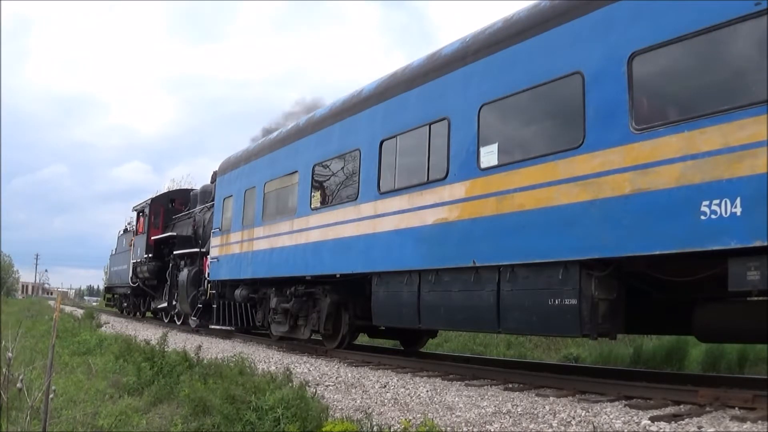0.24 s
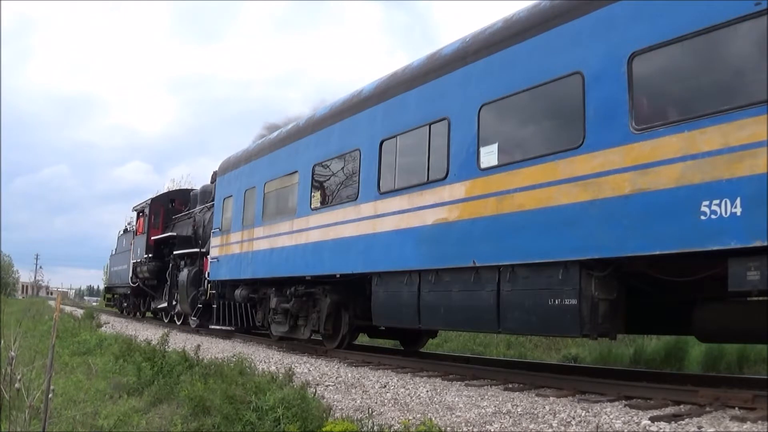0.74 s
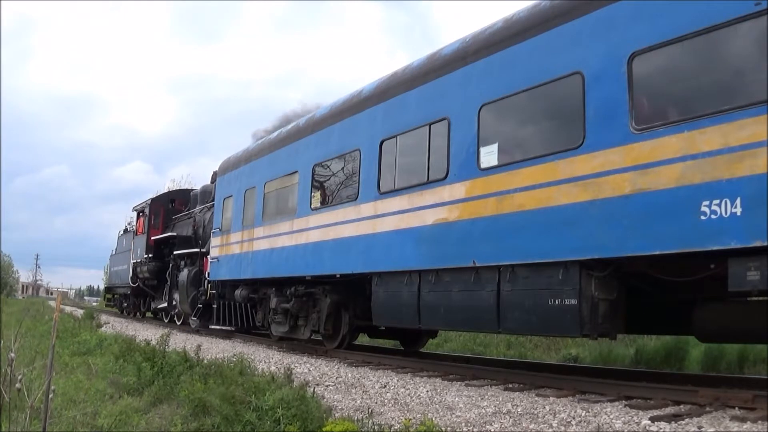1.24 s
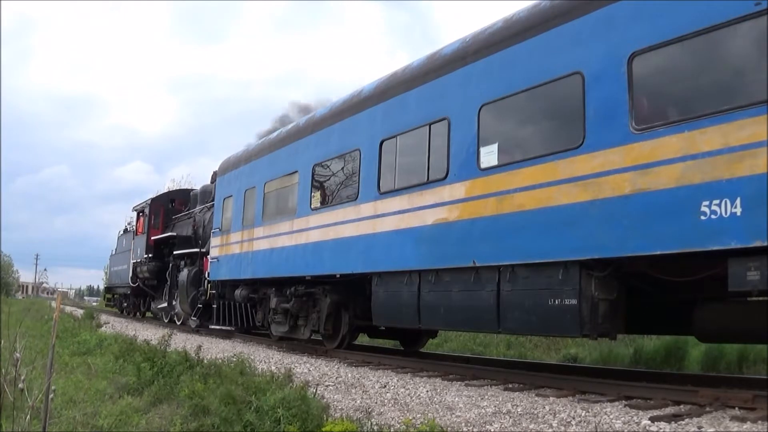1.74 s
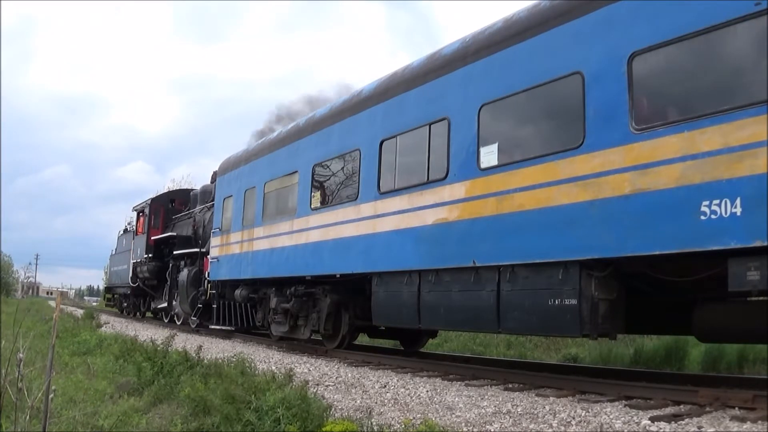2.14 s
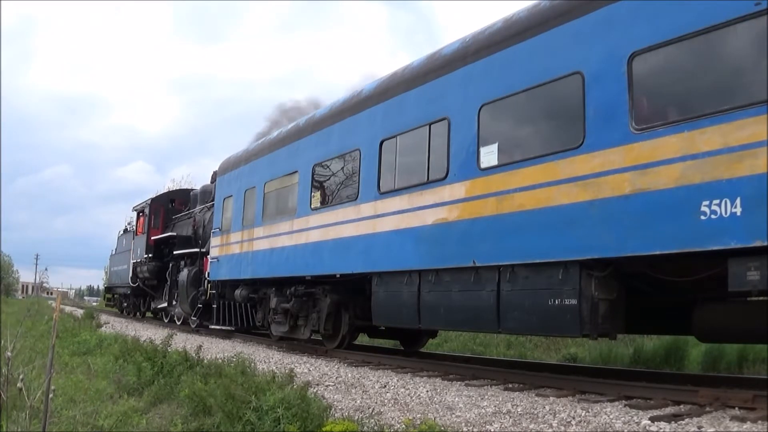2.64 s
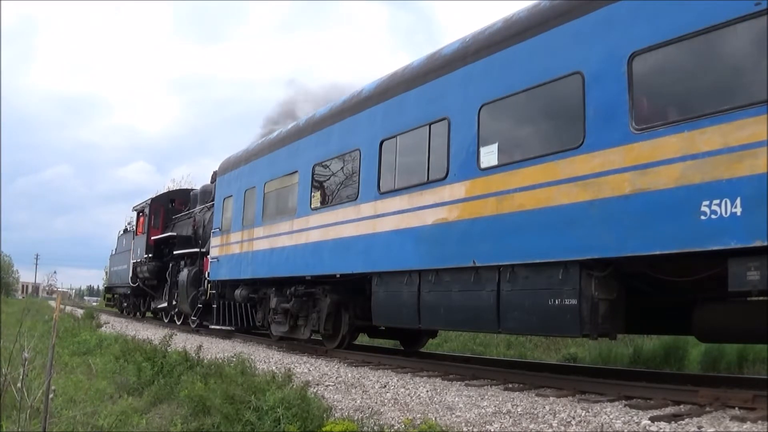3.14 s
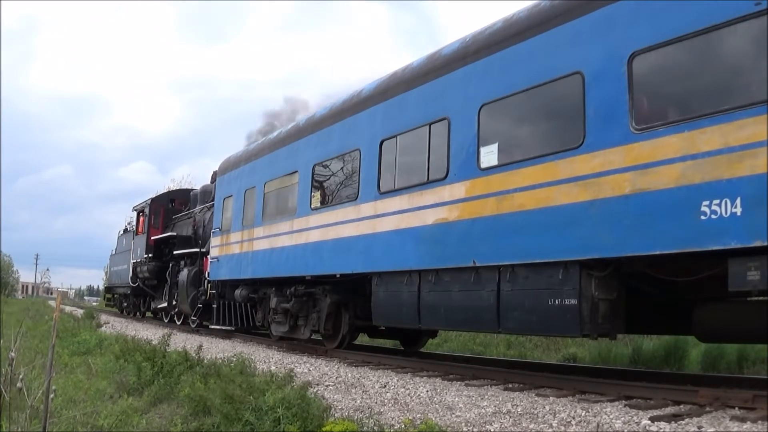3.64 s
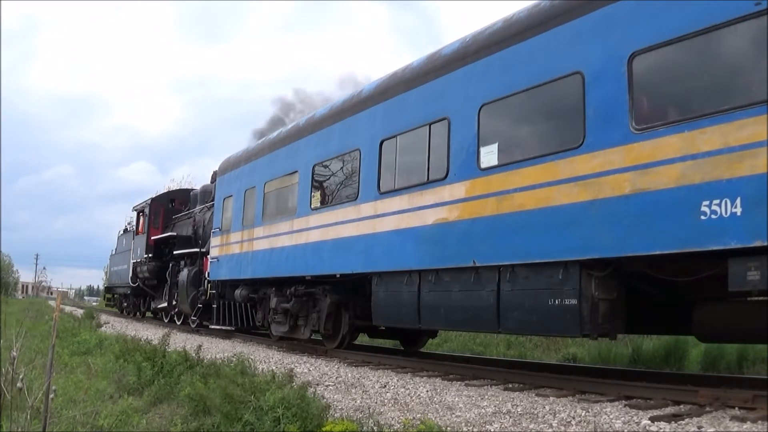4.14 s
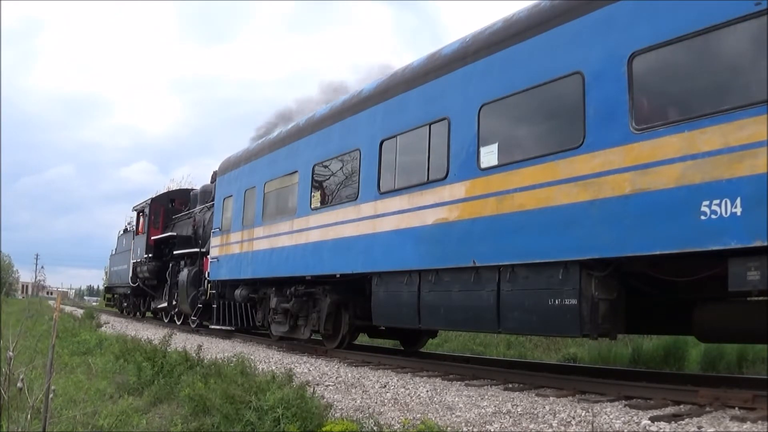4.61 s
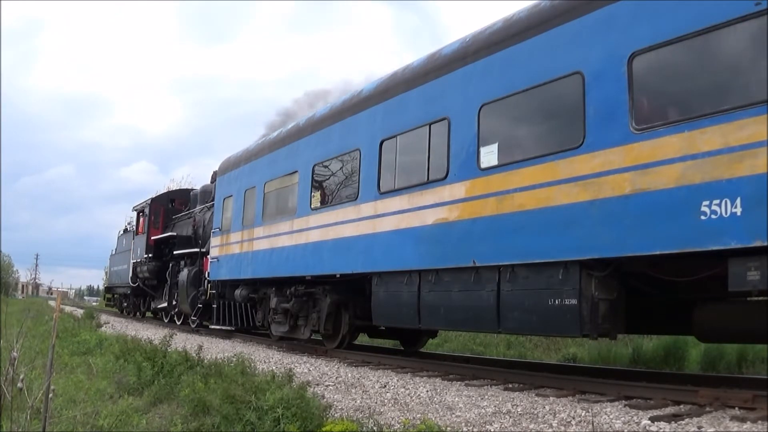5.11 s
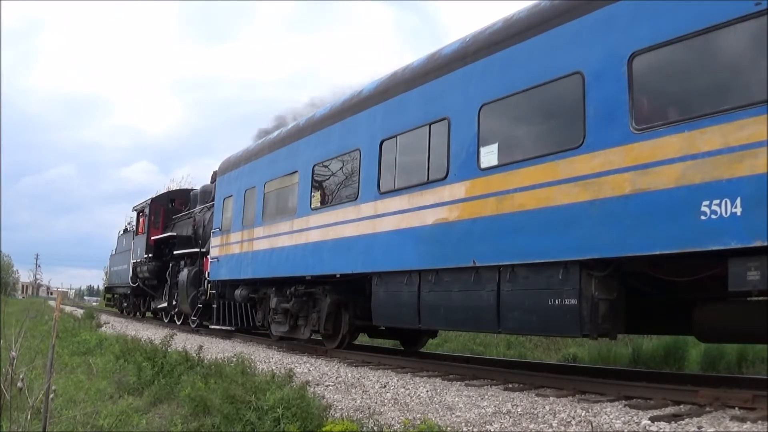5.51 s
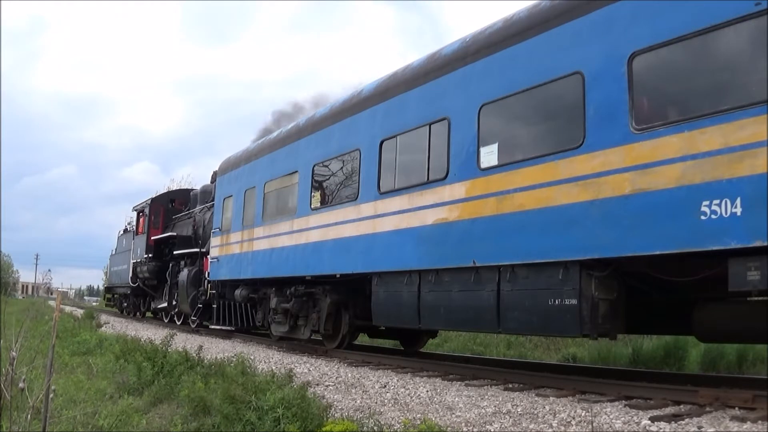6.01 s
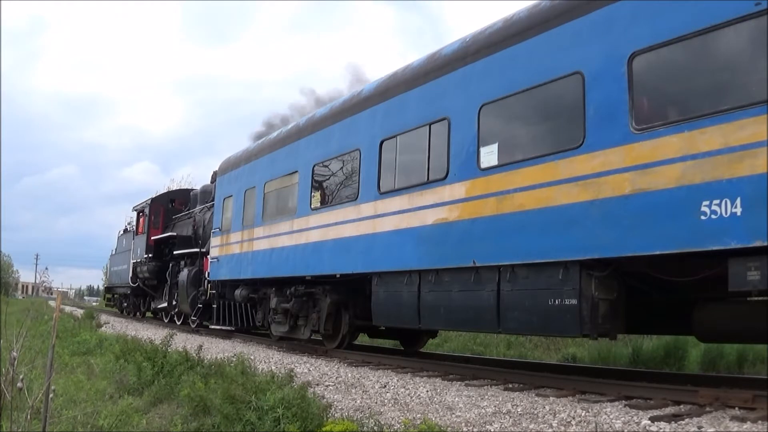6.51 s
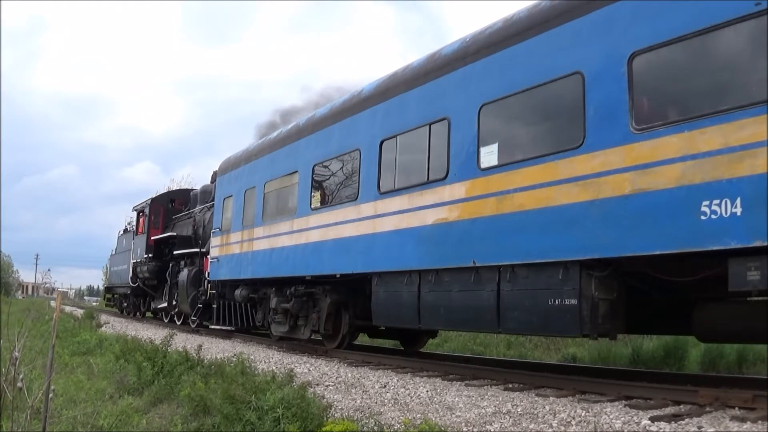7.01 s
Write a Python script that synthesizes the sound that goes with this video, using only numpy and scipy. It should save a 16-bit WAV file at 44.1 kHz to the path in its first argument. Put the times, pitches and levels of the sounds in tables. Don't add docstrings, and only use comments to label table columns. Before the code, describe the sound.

Close, bright steam hiss with low wind buffeting opens the scene, ducking under gusts. A tiny squeak leads into a rough blow-off with wavering howls, which thins, whistles piercingly and cuts off in two quick steps. Near-quiet follows; the automatic gain of the stereo microphone slowly lifts the remaining hiss and its fine pinhole whistles, with a few isolated wind thumps in open air.

```python
import sys
import numpy as np
from scipy import signal
from scipy.fft import rfft, irfft
from scipy.io import wavfile
from scipy.ndimage import uniform_filter1d

SR = 44100
rng = np.random.default_rng(int(sys.argv[2]) if len(sys.argv) > 2 else 0)


def amplitude_ratio(level_db):
    exponent = np.asarray(level_db, float) / 20
    return 10 ** exponent


def dump(signal):
    limited = np.clip(np.atleast_2d(signal).T, -1, 1)
    pcm = np.round(limited * 32767).astype(np.int16)
    wavfile.write(sys.argv[1], SR, pcm)


N = 320166

LEAK_BANDS_HZ = (4500, 1000, 12500)
LEAK_DB = -16
VALVE_OPENS_S = 1.078
# (time [s], thump peak [dB], pitch [Hz], rumble [dB])
EDDIES = [(0.04, -26, 124, -23), (0.121, -4.5, 136, -21.5), (0.246, -14, 72.7, -26), (0.415, -10, 74, -17),
          (0.549, -6, 143, -24), (0.642, -14, 130, -15), (0.698, -16, 144, -16.5), (0.764, -17, 108, -15),
          (0.842, -7.5, 159, -18), (0.942, -8, 153, -11), (1.311, -21, 148, -26.5),
          (1.492, -10.5, 250, -25), (1.614, -21.5, 303, -30), (1.692, -17, 188, -26.5),
          (1.836, -32, 133, -27), (2.048, -30, 130, -36.5), (2.245, -21.5, 140, -35),
          (2.326, -30, 150, -43), (2.55, -33, 250, -40.5), (2.678, -33, 137, -38.5),
          (2.784, -39, 72.7, -43), (3.05, -42, 110, -41), (3.67, -45, 100, -47), (4.288, -23, 110, -33.5),
          (4.36, -25, 135, -35), (5.32, -30, 150, -34), (6.09, -15.5, 130, -22.5), (6.165, -20, 110, -26),
          (4.442, -28, 132, -44), (7.12, -34, 87, -48)]


def clock():
    return np.arange(N) / SR


def louder(*levels_db):
    return 10 * np.log10(sum(amplitude_ratio(db) ** 2 for db in levels_db))


def bump(center_s, half_s):
    return np.exp(-((clock() - center_s) / half_s) ** 2)


def along(table, hz):
    at, value = np.transpose(table)
    return np.interp(np.log(hz + 1), np.log(at + 1), value)


def patches(rows, seconds, steps, count):
    field = rng.standard_normal((rows, len(seconds)))
    for _ in range(2):
        field = uniform_filter1d(field, max(int(steps), 1), axis=1)
        field = uniform_filter1d(field, count, axis=0)
    return field / field.std()


def ports(gain, likeness, lead, balance_db):
    size = 2 * (len(gain) - 1)
    mid, side = rfft(rng.standard_normal((2, size)))
    likeness = np.clip(likeness, 0, 1)
    mid = mid * np.sqrt(1 + likeness)
    side = side * np.sqrt(1 - likeness)
    turn = amplitude_ratio(balance_db / 2) * np.exp(.5j * lead)
    left, right = (mid + side) * turn, (mid - side) / turn
    return irfft(gain * np.array([left, right]), size)[:, :N]


def steam(level_db, shifts_db, bands_hz, colour, modes, band, swirl_db, flutter_db, puff_db):
    # (frequency [Hz], likeness [0-1], left minus right [dB], left leads by [rad])
    port_table = np.array([(172, 0.96, 0.4, 0.1), (517, 0.96, 1.0, 0.08), (1034, 0.9, 2.1, -0.02),
                           (2067, 0.85, 1.8, -0.04), (2929, 0.87, 1.7, -0.23), (3790, 0.94, 0.8, 0.0),
                           (4823, 0.88, 2.2, 0.13), (6029, 0.93, 2.9, 0.11), (7235, 0.86, 2.9, -0.12),
                           (8613, 0.93, 1.1, -0.2), (9647, 0.96, 0.2, -0.01), (11197, 0.96, 0.3, 0.03),
                           (12200, 0.97, 0.1, 0.0), (13781, 1.0, -0.0, -0.0)])
    hz = np.fft.rfftfreq(2 ** 19, 1 / SR)
    ring = 1 + sum(amplitude_ratio(db) ** 2 / (1 + (2 * (hz - f) / width) ** 2) for f, (width, db) in zip(*modes))
    gain = amplitude_ratio(along(colour, hz)) * np.sqrt(ring)
    likeness, balance_db, lead = (along(port_table[:, [0, k]], hz) for k in range(1, 4))
    jet = ports(gain, likeness, lead, balance_db)

    inside = (hz > band[0]) & (hz < band[1])
    band_share = np.sum(gain[inside] ** 2) / np.sum(gain ** 2)
    jet = jet / np.sqrt(np.mean(jet.mean(axis=0) ** 2) * band_share)
    f, t, cells = signal.stft(jet, SR, nperseg=256)
    db = np.interp(t, clock(), level_db)

    order = np.argsort(bands_hz)
    shift = np.array([0 * t] + [np.interp(t, clock(), e) for e in shifts_db])[order]
    place = np.interp(np.log(f + 1), np.log(np.array(bands_hz)[order]), np.arange(len(order)))
    tilt = np.maximum(1 - abs(place[:, None] - np.arange(len(order))), 0) @ shift

    swirl = swirl_db * patches(len(f), t, steps=65, count=2) * np.clip(f / 900, .3, 1)[:, None]
    flutter = flutter_db * patches(len(f), t, steps=5.4, count=12)
    puffs = puff_db * patches(1, t, steps=11.4, count=1)
    cells = cells * amplitude_ratio(db + tilt + swirl + flutter + puffs)
    return signal.istft(cells, SR, nperseg=256)[1][:, :N]


def swelling(follow_db, under_db, swells):
    t = clock()

    def bell(s, db, half):
        return np.maximum(db - 8.7 * ((t - s) / half) ** 2, -120)

    return np.array([louder(follow_db + db, *[bell(*row) for row in rows])
                     for db, rows in zip(under_db, swells)])


def whistles(levels_db, centre_hz, wander_hz, trim_db):
    t = clock()
    shiver = patches(3, t, steps=300, count=1)
    waver = patches(3, t, steps=900, count=1)
    hz = np.array(centre_hz)[:, None] + np.array(wander_hz)[:, None] * shiver
    strength = np.sqrt(2) * amplitude_ratio(levels_db + 1.46 * waver + trim_db)
    tones = np.sum(strength * np.sin(2 * np.pi * np.cumsum(hz, axis=1) / SR), axis=0)
    return tones * amplitude_ratio(np.array([[.8], [-.8]]))


def leak_before():
    # (frequency [Hz], level [dB per Hz])
    hiss_colour = [(410, -5.5), (700, -12), (1120, -11.5), (2000, -7.5), (3540, -7), (5000, -5.5),
                   (9900, -1.5), (11300, -10.5), (14000, -21.5), (15700, -35)]
    pipe_hz = (1238, 1670, 2040, 2387, 2830, 2985, 3160, 3890, 4320, 4750, 5150, 5600, 6450, 6870, 7740,
               8900, 9660, 10200)
    # (width [Hz], level over the hiss [dB])
    pipe_ring = [(29.8, 8.5), (50, 2.5), (60, 8), (35, 9.5), (35, 12), (50, 2), (80, 3.5), (45, 12.5),
                 (50, 10.5), (39.8, 12), (70, 6), (100, 6), (70, 2), (60, 6), (110, 4), (300, 0.5),
                 (129.6, -7), (108, 3)]
    duck_s, duck_db, recover_s = (.12, .548, .958), (-0.5, -8.5, -5.5), 0.29
    t = clock()
    level_db = LEAK_DB - 15 * bump(.964, 0.012)
    for s, db in zip(duck_s, duck_db):
        level_db = level_db + db * np.clip((t - s) / .012, 0, 1) * np.exp(-np.maximum(t - s, 0) / recover_s)
    bass_db = 0.5 + 0.22 * (LEAK_DB - level_db)
    return steam(level_db, [bass_db, 0 * t], LEAK_BANDS_HZ, hiss_colour, (pipe_hz, pipe_ring),
                 (2000, 10000), swirl_db=0.5, flutter_db=0.56, puff_db=0.48)


def gusts():
    # (time [s], level [dB])
    breeze = [(0.0, -17), (0.3, -14.5), (0.46, -38), (0.54, -34), (0.57, -13.5), (0.92, -28), (1.075, -15),
              (1.11, -37), (1.8, -46), (2.1, -62), (3.2, -72), (4.25, -64), (4.5, -60), (5.6, -69),
              (6.05, -60), (6.26, -42), (6.65, -62), (7.26, -46)]
    lag_s, rise_db_per_s, fall_db_per_s = 0.013, 380, 198
    t = clock()[::64]
    since = t - np.array(EDDIES)[:, :1] - lag_s
    peaks = np.array(EDDIES)[:, 3:] - np.where(since < 0, -rise_db_per_s, fall_db_per_s) * since
    level_db = louder(np.interp(t, *np.transpose(breeze)), *np.maximum(peaks, -120))
    return np.interp(clock(), t, level_db)


def wind():
    # (frequency [Hz], level [dB per Hz])
    rumble_colour = [(12, -39), (20, -16), (59, -1), (92, -3.5), (135, -2), (240, -5), (687, -20),
                     (900, -21.5), (1170, -33), (1980, -120)]
    hz = np.fft.rfftfreq(2 ** 19, 1 / SR)
    likeness, lag_s = 0.73 * np.exp(-hz / 1200), .0006
    rumble = ports(amplitude_ratio(along(rumble_colour, hz)), likeness, 2 * np.pi * hz * lag_s, 0 * hz)
    lumps = np.repeat(patches(1, clock()[::64], steps=9, count=1)[0], 64)[:N]
    rumble = rumble * amplitude_ratio(1.5 * uniform_filter1d(lumps, size=64))
    return rumble / rumble.mean(axis=0).std() * amplitude_ratio(gusts() - 3.0)


def thumps():
    slap_db, slap_ratio = -10.5, 2.05
    out = np.zeros((2, N + SR))
    chance = rng.uniform(-1.02, 1, (len(EDDIES), 3))
    u = np.arange(SR // 10) / SR
    for (s, db, hz, _), (turn, twist, side) in zip(EDDIES, chance):
        i = int(s * SR)
        swing = (u - .015) * hz
        pan_db = 4 * side
        phase = 2 * np.pi * swing + np.pi * turn + np.array([[.6], [-.6]]) * (1 + 0.2 * twist)
        thump = np.exp(-(swing / 0.63) ** 2) * np.cos(phase)
        slap = amplitude_ratio(slap_db) * np.exp(-(slap_ratio * swing / 0.75) ** 2) * np.cos(slap_ratio * phase)
        out[:, i:i + len(u)] += amplitude_ratio(db + np.array([[pan_db], [-pan_db]]) / 2) * (thump + slap)
    return out[:, :N]


def squeak():
    start_s, peak_db, hz, half_s = 1.082, -16, 3300, .004
    return amplitude_ratio(peak_db) * bump(start_s, half_s) * np.sin(2 * np.pi * hz * (clock() - start_s))


def blast_flow():
    # (time [s], level [dB], surge [dB])
    blast_table = [
        (1.11, -18.5, -12),
        (1.24, -18, 3),
        (1.6, -19, 4),
        (1.85, -19.5, 1),
        (2.15, -18, -0.5),
        (2.38, -17, 4.5),
        (2.62, -17.5, -5),
        (2.85, -18, 9),
        (3.08, -16.5, -4),
    ]
    surge_share = (0.87, 0.2, -.1)
    thin_from_s, cut_s = 3.123, 3.385
    thin_db_per_s, late_s = (-7, -33, -75), (0, 0, .1)
    cut_db_per_s, linger = -300, (0.57, .3, 0.1)
    sag_db_per_s = -32
    t = clock()
    s, level_db, surge_db = np.transpose(blast_table)
    thin = np.clip(t - thin_from_s, 0, cut_s - thin_from_s)
    cut_db = cut_db_per_s * np.maximum(t - cut_s, 0)
    surge = np.interp(t, s, surge_db)
    shifts = [share * surge + rate * np.maximum(thin - late, 0) - stay * np.maximum(cut_db, -24)
              for share, rate, stay, late in zip(surge_share, thin_db_per_s, linger, late_s)]
    return np.maximum(np.interp(t, s, level_db) + sag_db_per_s * thin + cut_db, -120), shifts


def blast(level_db, shifts):
    # (frequency [Hz], level [dB per Hz])
    jet_colour = [(350, -76), (600, -28), (915, -16.5), (1330, -20), (1810, -6.5), (2130, -10), (3300, -5),
                  (4560, -1.5), (9120, -0.5), (10000, -1.5), (11200, -10.5), (14000, -21), (15700, -61)]
    nozzle_hz = (1820, 2370, 2670, 3720, 5320, 6550, 7460, 8550, 8870)
    # (width [Hz], level over the jet [dB])
    nozzle_ring = [(83.333, -43), (64.815, 2), (70, 0.5), (60, -3), (80, -2), (75.926, -6), (194.44, -2),
                   (154, -9), (180, -1)]
    bands_hz = (5500, 1000, 3200, 9800)
    return steam(level_db, shifts, bands_hz, jet_colour, (nozzle_hz, nozzle_ring), (4300, 7000),
                 swirl_db=1.8, flutter_db=1.0, puff_db=0.27)


def howls(blast_db):
    # (time [s], level [dB], half length [s])
    howl_swells = [
        [(1.9, -26.5, .3)],
        [(1.15, -26, 0.15), (1.5, -23.5, .12), (2.36, -22, 0.3)],
        [(1.5, -32, .1), (2.33, -26, 0.21), (2.85, -25, .15), (3.22, -29, .08)],
    ]
    under_db = (-24, -15, -15)
    return whistles(swelling(blast_db, under_db, howl_swells), centre_hz=(4000, 4430, 4720),
                    wander_hz=(60, 70, 70), trim_db=-1.0)


def choke():
    # (time [s], level [dB])
    choke_table = [
        (3.1, -32),
        (3.19, -19),
        (3.3, -18),
        (3.33, -15.5),
        (3.385, -16),
        (3.415, -26),
        (3.557, -28),
        (3.585, -44),
        (3.66, -57),
    ]
    # (frequency [Hz], level [dB per Hz])
    choke_colour = [(410, -56), (700, -34), (779, -18), (1050, -20.5), (1400, -18), (1790, -7.5),
                    (2240, -14), (3020, -4), (4070, -9), (5880, 2.5), (6390, -3), (7730, -11), (12000, -23),
                    (15600, -72), (22000, -120)]
    seat_hz = (1060, 2620, 3000, 3310, 3600, 5040, 5340, 5870, 6600, 7150, 7660)
    # (width [Hz], level over the hiss [dB])
    seat_ring = [(54.63, 15), (51, 10), (90.5, 10), (42, 9), (100, 1), (140.4, 5), (110, 7), (130, 10),
                 (100, -2), (50.3, 1), (90.741, 16)]
    bands_hz = (5500, 3000, 1900, 7600)
    step_from_s, step_db, step_s, step_share = 3.39, 13, .025, (1.0, .45, .35)
    t = clock()
    level_db = np.interp(t, *np.transpose(choke_table), left=-120, right=-120)
    lower_db = step_db * (np.clip((t - step_from_s) / step_s, 0, 1) - .55)
    return steam(level_db, [share * lower_db for share in step_share], bands_hz, choke_colour,
                 (seat_hz, seat_ring), (5000, 6300), swirl_db=0.6, flutter_db=0.1, puff_db=0.3)


def pinholes(leak_db):
    # (time [s], level [dB], half length [s])
    pinhole_swells = [
        [(3.5, -34, 0.1), (4.19, -42, .1), (5.25, -36, 0.13), (6.9, -31, 0.16)],
        [(3.91, -50, .06), (6.86, -34, 0.27)],
        [(3.45, -44, .1), (3.84, -47, .07), (4.17, -48, .08), (5.45, -49, .3), (7.26, -29, .2)],
    ]
    under_db = (-16, -31, -40)
    return whistles(swelling(leak_db, under_db, pinhole_swells), centre_hz=(2985, 2400, 2825),
                    wander_hz=(10, 8, 7), trim_db=-4.0)


def leak_after():
    # (frequency [Hz], level [dB per Hz])
    joint_colour = [(18, -34), (30, -5), (137, -0.5), (230, -9), (620, -11.5), (1330, -10.5), (3500, -9),
                    (5500, -5.5), (7000, -5), (9800, -4.5), (11200, -12), (14000, -21), (15700, -28)]
    joint_hz = (410, 807, 1940, 2400, 2825, 2985, 3200, 3860, 4200, 4580, 5400, 6000, 6295, 7700, 8835,
                9640)
    # (width [Hz], level over the hiss [dB])
    joint_ring = [(148, 6.3), (48.148, 3.4), (41.667, 2.2), (90, 6.9), (59.6, 9.4), (55.3, 10.4),
                  (120, 4.4), (62.963, 4.3), (74.074, 1.1), (70, 2.1), (60, 1.66), (350, 1.3), (59, 1.5),
                  (100, 2.7), (110, 2.4), (250, 0.6)]
    # (time [s], rise [dB], half length [s])
    leak_puffs = [
        (4.402, 2, 0.069),
        (5.727, 1, 0.11),
        (6.6, 0.6, 0.099),
    ]
    creep_from_db, creep_db_per_s = -38, 5
    creep_s = np.maximum(clock() - 3.49, 0)
    puffs = sum(db * bump(s, half) for s, db, half in leak_puffs)
    level_db = puffs + creep_from_db + creep_db_per_s * creep_s
    lag = [rate * creep_s + 1.33 for rate in (-0.67, -1.08)]
    hiss = steam(level_db, lag, LEAK_BANDS_HZ, joint_colour, (joint_hz, joint_ring), (2000, 10000),
                 swirl_db=1.15, flutter_db=0.1, puff_db=0.58)
    return hiss + pinholes(level_db)


def scene():
    since = clock() - VALVE_OPENS_S
    opened = np.clip(since / .012, 0, 1)
    overshoot_db = -14 * opened * np.exp(-np.maximum(since, 0) / .025)
    blast_db, shifts = blast_flow()
    after_opening = blast(blast_db, shifts) + howls(blast_db) + leak_after()
    hiss = leak_before() * (1 - opened) + squeak() + after_opening * opened + choke()
    return hiss + wind() * amplitude_ratio(overshoot_db) + thumps()


def band_limit(x):
    return signal.sosfilt(signal.butter(12, 15710, fs=SR, output="sos"), x)


def record(dry):
    mix = np.clip(1.624 * np.tanh(dry / 1.56), -1, 1)
    return band_limit(mix)


dry = scene()
out = record(dry)
dump(out)
```